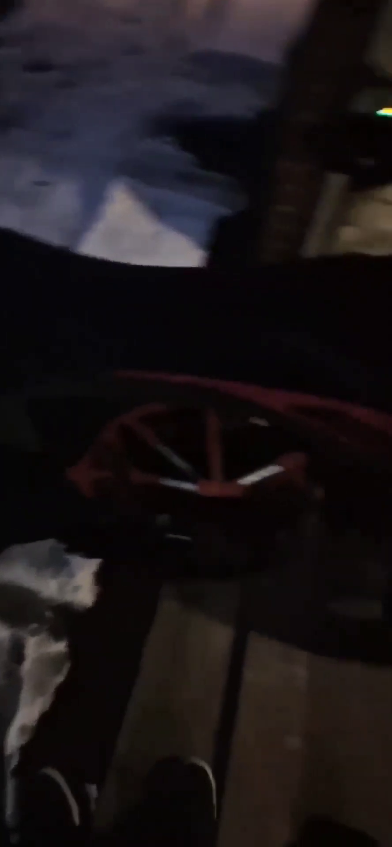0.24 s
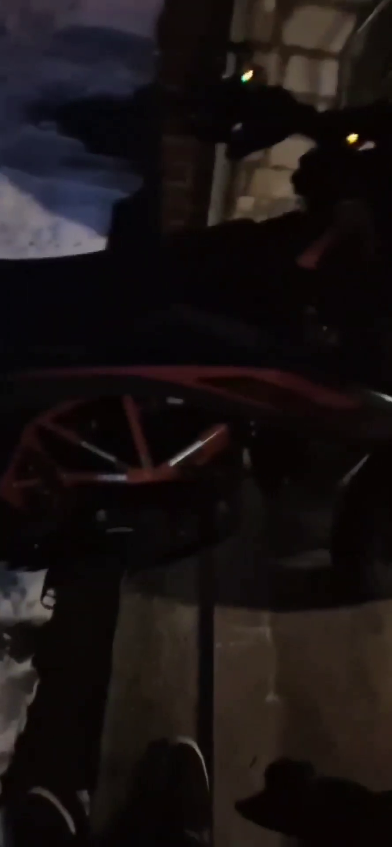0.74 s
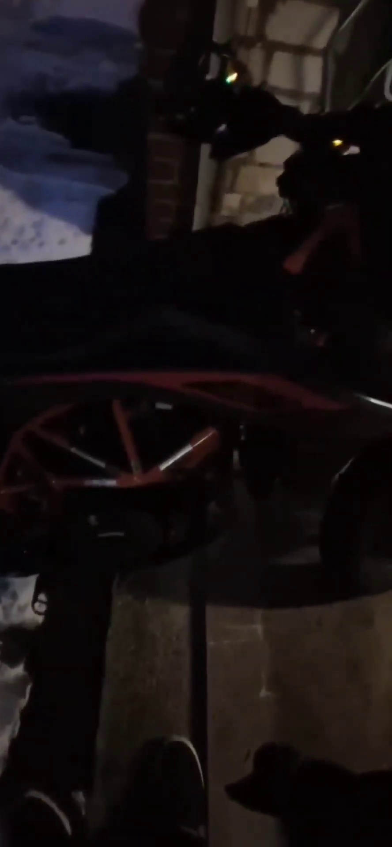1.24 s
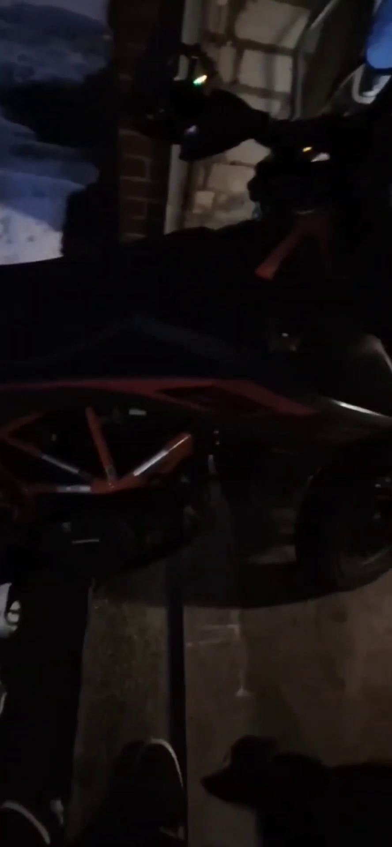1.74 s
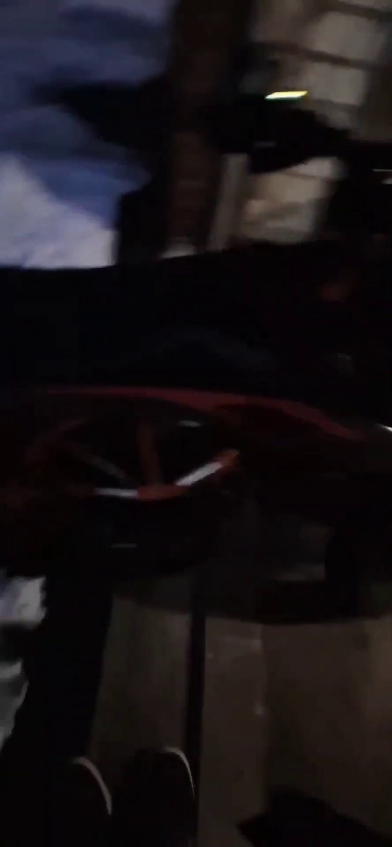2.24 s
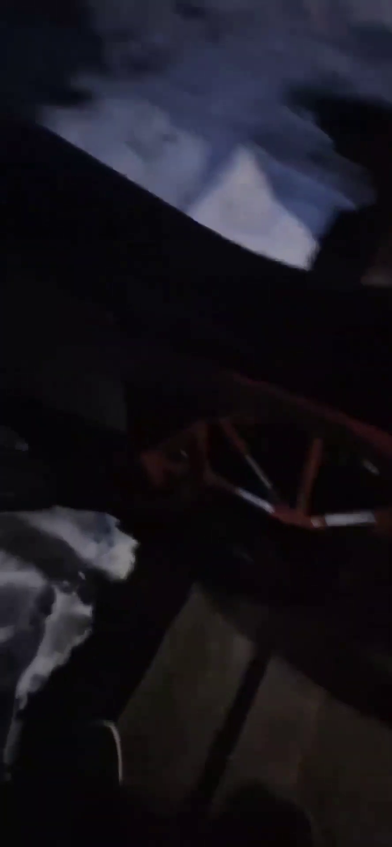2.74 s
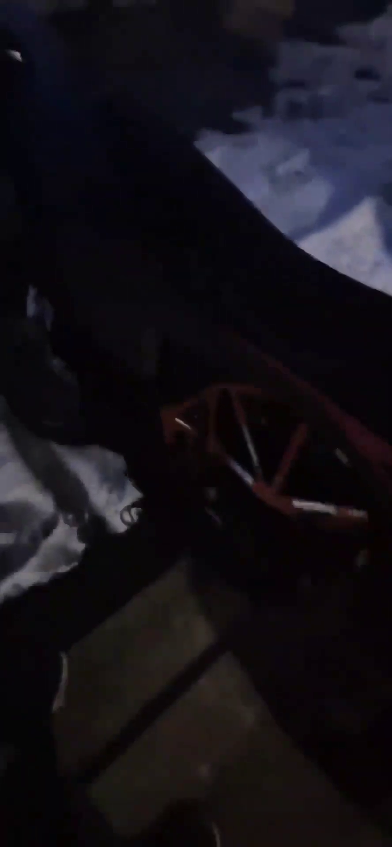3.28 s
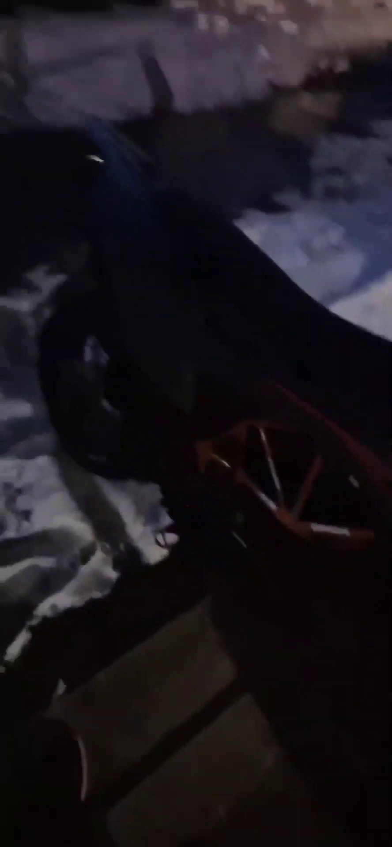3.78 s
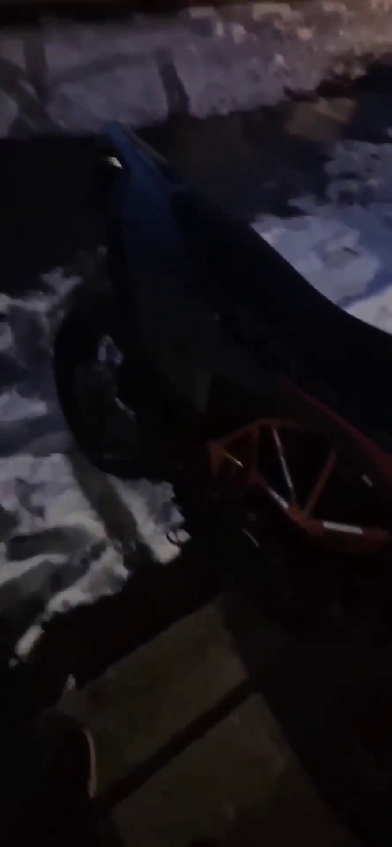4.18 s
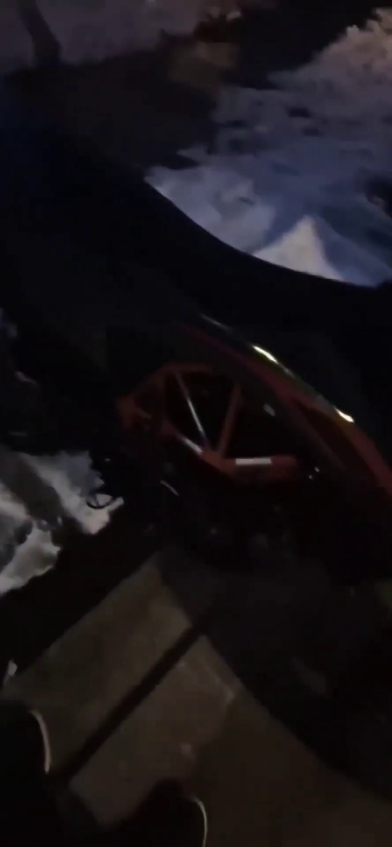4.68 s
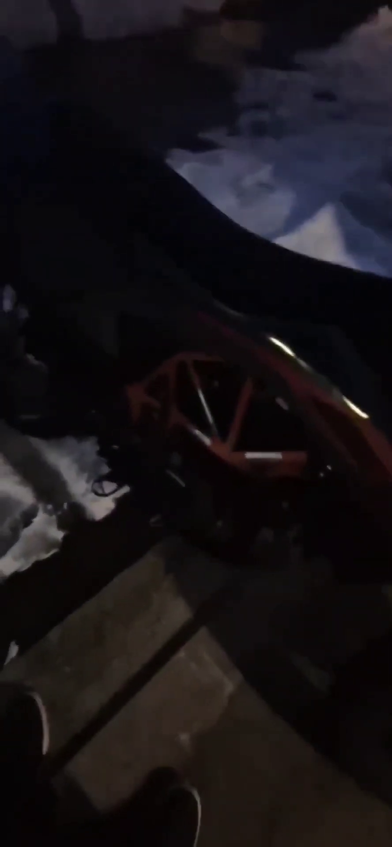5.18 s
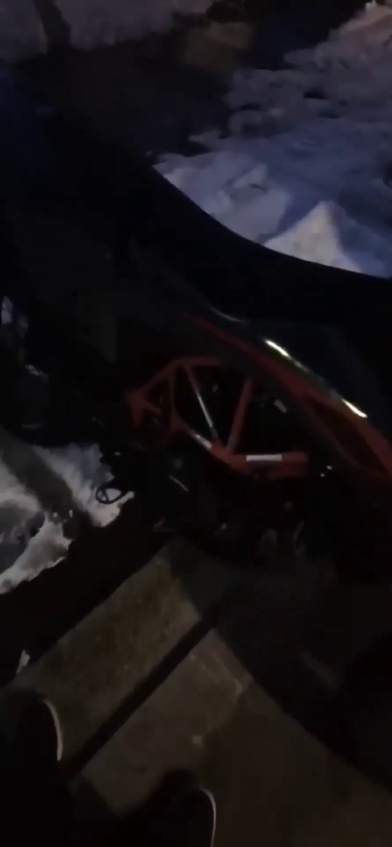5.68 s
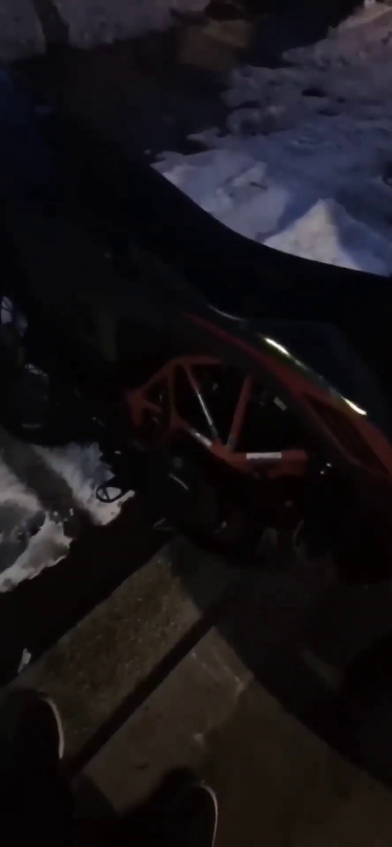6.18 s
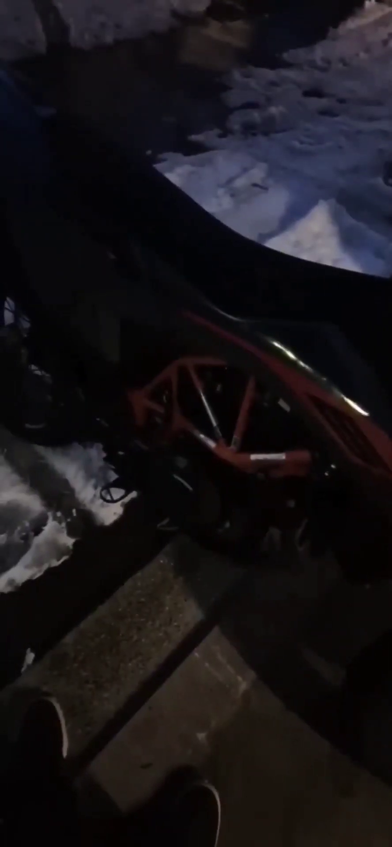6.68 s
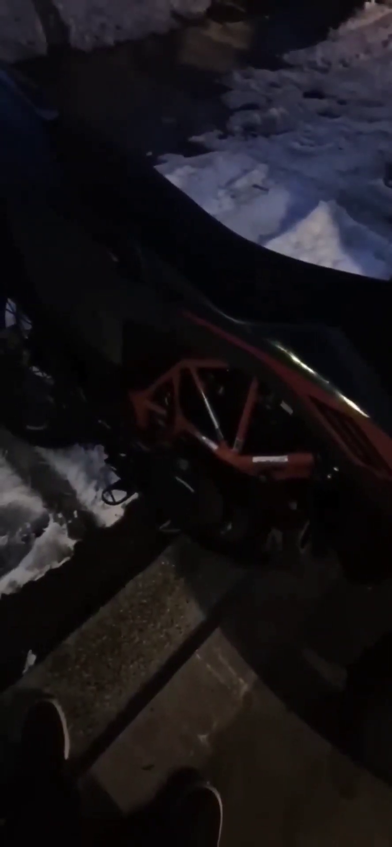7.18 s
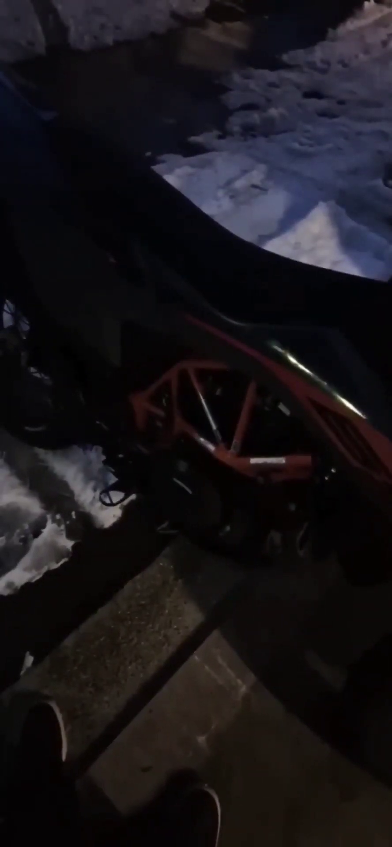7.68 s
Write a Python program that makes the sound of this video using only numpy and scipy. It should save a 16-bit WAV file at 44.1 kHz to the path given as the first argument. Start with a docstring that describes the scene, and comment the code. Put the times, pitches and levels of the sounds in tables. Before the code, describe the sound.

Outdoors at night, close to a motorcycle, the starter is already cranking. From 0 to about 1.6 s four slow cycles pass, one every 0.44 s: a rough toothed grind sags in pitch under compression, a deep hollow exhaust pop and softer puff follow, and most cycles end in a loose metallic clank. A brief squeal comes near 0.9 s. At 1.6 s the clutch knocks and the cranking stops. Until 2.8 s there is low outdoor rumble with very faint gliding whines, a dull click at 2.2 and a crisper relay click at 2.8. The starter then engages with whirring, chattering gears, ringing knocks and short squeals, its exhaust nearly silent until 3.9 s. From there heavy thumping, grinding and clanking repeat steadily to 8 s, with a strong clutch knock at 4.5, lesser ones around 6.6 and 7.2, and occasional squeals. The engine never catches; nearby walls answer briefly.

```python
"""An electric starter cranks a cold twin-cylinder motorcycle in a yard, in two spells; it never catches. From
the start toothed gears grind, sag in pitch on each compression and clank when the crank overruns. The cylinders
thump and puff unburnt charge into a ringing exhaust pipe; some strokes squeal. In the pause faint sine whines
glide and clicks sound; clutch blows ring the housing, mostly on restarting, and the second spell grinds on to
the end over a low outdoor rumble of shaped noise."""
import sys
import numpy as np
from scipy import signal
from scipy.fft import rfft, irfft, next_fast_len
from scipy.io import wavfile
from scipy.ndimage import uniform_filter1d, map_coordinates

SR = 44100
rng = np.random.default_rng(int(sys.argv[2]) if len(sys.argv) > 2 else 0)


def file_out(sig):
    """Save sig as 16-bit WAV at sys.argv[1]."""
    # one column per channel
    cols = np.atleast_2d(sig).T
    # limit, then scale
    lim = np.clip(cols, -1, 1)
    pcm = np.round(lim * 32767).astype(np.int16)
    wavfile.write(sys.argv[1], SR, pcm)


N = 349713

# Engine cycles. Each row: exhaust pop in s, lead of the short stroke in s, lag to the second cylinder's
# puff in s, lag to the overrun in s, then relative levels of exhaust, grind and overrun clank in dB.
ENGINE_CYCLES = [(.1515, .077, 0.069, 0.12, -1, -22.5, -16.5), (.5895, 0.074, .072, 0.12, -1, -23, -17.5),
                 (1.0285, 0.074, 0.068, 0.12, -1, -23, -17.5), (1.462, 0.078, 0.08, .136, -1.5, -23, -45),
                 (3.17, .072, 0.055, 0.096, -23, -24, -31), (3.55, 0.076, 0.062, 0.1, -32, -23, -38),
                 (3.9369, 0.076, 0.07, 0.13, 0, -22.5, -16),
                 (4.3792, 0.082, 0.097, 0.16, -1.5, -22.5, -14.5),
                 (4.8756, 0.074, .072, 0.13, 0, -22.5, -16.5), (5.3138, .076, 0.071, 0.13, 0, -23, -16),
                 (5.7554, .077, .075, .128, -0.5, -22, -14.5), (6.198, .076, 0.07, 0.13, 0.5, -23, -17),
                 (6.6299, .074, 0.071, 0.13, 0, -22.5, -18.5), (7.0613, 0.073, 0.083, 0.14, -0.5, -23, -15),
                 (7.528, 0.077, .07, 0.13, 0, -22.5, -22), (7.938, 0.075, .073, .126, -2, -23.5, -12)]
# Starter motor. Each row: time in s, share of full speed, relative gear whirr in dB.
STARTER_RUN = [(1.5, 0.99, -44.5), (1.7, 0.79, -76), (1.77, 0.97, -65.5), (2.795, 0.59, -114),
               (2.812, 0.71, -37.5), (2.9, 0.73, -33.5), (3.06, 0.89, -43), (3.17, 0.83, -43.5),
               (3.22, 0.87, -33.5), (3.33, .9, -40.5), (3.45, 0.98, -44), (3.56, .95, -38.5),
               (3.62, 0.84, -36), (3.85, 1, -43)]
# Starter clutch slips and grabs, plus the late overrun clank that ends the first spell at 1.643 s. Each row:
# time in s, relative level in dB, mean ring in Hz.
CLUTCH_GRABS = [(1.643, -19.5, 1550), (2.964, -22, 2363), (3.101, -21, 2742), (3.186, -18.5, 1290),
                (3.258, -17, 2264), (3.378, -24, 2330), (3.574, -17, 2135), (3.644, -18.5, 2310),
                (3.767, -25, 2250), (4.486, -11.5, 1397), (6.584, -18.5, 2230), (7.158, -19.5, 1435)]
# Stereo lean. Each row: frequency in Hz, left minus right in dB.
STEREO_LEAN = [(120, -2.5), (500, -1.5), (1200, -4.5), (2300, 2.5), (4000, 3), (8000, 4.5)]


def amp(db):
    """Decibels to gain."""
    return 10 ** (np.asarray(db) / 20)


def unit(x):
    """Scale to rms 1."""
    return x / np.sqrt(np.mean(x ** 2) + 1e-20)


def along(points, hz):
    """Interpolate (Hz, value) points on a log frequency axis."""
    f, v = np.transpose(points)
    return np.interp(np.log(hz + 1), np.log(f + 1), v)


def clock():
    """Time of each sample in s."""
    return np.arange(N) / SR


def curves(rows):
    """One value per sample for each column after the time."""
    s, *cols = np.transpose(rows)
    return [np.interp(clock(), s, c) for c in cols]


def wobble(rate):
    """Smooth random curve, rate knots a second."""
    return map_coordinates(rng.standard_normal(int(N * rate / SR) + 4), [clock() * rate])


def wobble_pair(rate):
    """Two independent wobbles."""
    return np.array([wobble(rate), wobble(rate)])


def noise_pair():
    """Two independent white noises."""
    return rng.standard_normal((2, N))


def filtered(x, response):
    """Multiply the spectrum of x by a response of frequency."""
    m = next_fast_len(N + SR // 2)
    return irfft(rfft(x, m) * response(np.fft.rfftfreq(m, 1 / SR)), m)[..., :N]


def coloured(x, spectrum):
    """Filter x by (Hz, dB) points, to rms 1."""
    return unit(filtered(x, lambda hz: amp(along(spectrum, hz))))


def add(track, s, sound):
    """Mix a sound into a track at time s."""
    start = int(np.clip(round(s * SR), 0, N))
    track[start:start + len(sound)] += sound[:N - start]


def add_leaning(track, s, sound, hz):
    """Mix a mono sound into a stereo track with the lean at its frequency."""
    for side, sign in zip(track, (.5, -.5)):
        add(side, s, amp(sign * along(STEREO_LEAN, hz)) * sound)


def spread(pair):
    """Two unrelated signals become left and right, alike in the bass, leaning by frequency."""
    # Each row: frequency in Hz, likeness of left and right from 0 to 1.
    likeness = [(250, 1), (500, 0.89), (1000, 0.58), (2300, 0.7), (9000, 0.074)]

    def mid_side_gains(hz):
        turn = np.arccos(np.clip(along(likeness, hz), -1, 1)) / 2
        return np.array([np.cos(turn), np.sin(turn)])

    def lean_gains(hz):
        return amp(np.outer([.5, -.5], along(STEREO_LEAN, hz)))

    mid, side = filtered(pair, mid_side_gains)
    return filtered(np.array([mid + side, mid - side]), lean_gains)


def blows(rows, rise, decay):
    """Envelope of (s, dB) blows that swell and die away; rise and decay in s."""
    t, track = np.arange(SR // 5) / SR, np.zeros(N)
    shape = (1 - np.exp(-(t / rise) ** 2)) * np.exp(-t / decay)
    for s, db in rows:
        add(track, s, amp(db) * shape / shape.max())
    return track


def night():
    """Low outdoor rumble: noise weighted to the bass."""
    # Each row: frequency in Hz, relative level in dB per Hz.
    night_spectrum = [(15, -29), (25, 2.5), (67, -2), (604, -15.5), (2200, -32.5), (6200, -39.5),
                      (10000, -44.5), (15000, -52)]
    return amp(-46) * spread(coloured(noise_pair(), night_spectrum))


def compressions(swell_db, ease_db, rise, release):
    """Load, its singing part and full-speed mesh pitch: each stroke swells the load and drags pitch down."""
    # Gear mesh over a compression. Each row: share of the stroke, mesh in Hz at full speed.
    mesh_sag = [(-.8, 1467), (0, 1400), (.44, 1280), (.73, 1200), (1, 1150), (1.8, 1480)]
    long_lead_s, long_s, long_db = .207, .07, .5
    short_s, short_whine_db = .051, -4.5
    t, load, song = clock(), np.zeros(N), np.zeros(N)
    mesh_hz = np.full(N, float(mesh_sag[-1][1]))
    strokes = []
    for pop, lead, _, _, _, db, _ in ENGINE_CYCLES:
        strokes.append((pop - long_lead_s, long_s, db + long_db, 0))
        strokes.append((pop - lead, short_s, db, short_whine_db))
    for start, length, db, whine_db in strokes:
        end = start + length
        near = slice(max(int((start - .1) * SR), 0), int((end + .1) * SR))
        u = (t[near] - start) / length
        before, after = np.minimum(t[near] - start, 0), np.maximum(t[near] - end, 0)
        edges = np.exp(before / rise - after / release)
        push = edges * amp(db + np.interp(u, [0, .45, .75, 1], [-swell_db, 0, 0, -ease_db]))
        load[near] += push
        song[near] += push * amp(whine_db)
        mesh_hz[near] = np.minimum(mesh_hz[near], np.interp(u, *np.transpose(mesh_sag)))
    return load, song, mesh_hz


def backlash(bounce_s, bounce_db, count=3):
    """Gears take up slack, knock before the puff, clank and bounce on overrun; the clutch jars them too."""
    # Knocks before the puff. Each row: lead in s, relative level in dB.
    gear_knocks = [(0.019, -24.5), (0.0088, -22)]
    take_up_db = 2.5  # over the grind
    clank_delay_s, bounce_loss_db = .0178, 3.5  # from overrun to clank; loss at each further bounce
    clutch_bounce_db = -11.5
    hits = []
    for pop, lead, lag, overrun, _, grind_db, clank_db in ENGINE_CYCLES:
        hits.append((pop - lead + .0031, grind_db + take_up_db))
        hits += [(pop + lag - knock_lead, db) for knock_lead, db in gear_knocks]
        clank_s = pop + overrun + clank_delay_s
        hits.append((clank_s, clank_db))
        for k in range(count):
            hits.append((clank_s + (k + 1) * bounce_s, clank_db + bounce_db - k * bounce_loss_db))
    for s, db, _ in CLUTCH_GRABS:
        hits += [(s, db), (s + bounce_s, db + clutch_bounce_db)]
    return blows(hits, rise=.0022, decay=.0105)


def judder():
    """Loaded gears catch and let go at an uneven rate: a sawtooth of gain in dB."""
    mean_hz, depth_db = 70, 5
    turns = np.cumsum(mean_hz * (1 + .2 * wobble(60))) / SR
    return unit(uniform_filter1d(amp(-depth_db * (turns % 1)), size=30))


def frame(x, t60):
    """Covers and frame tubes ring with a thicket of short modes, differently towards each ear."""
    t = np.arange(SR // 12) / SR
    ring = rng.standard_normal((2, len(t))) * amp(-60 * t / t60)
    return signal.fftconvolve(x[None], ring / np.linalg.norm(ring[0]), axes=1)[:, :N]


def ticks(force):
    """Now and then a tooth lands hard: a dry tick that stands out of the rasp."""
    mean_per_s, spread_db = 380, 4
    sizes = amp(spread_db * np.clip(rng.standard_normal(N), -2, 1.5))
    hits = (rng.random(N) < mean_per_s / SR) * sizes
    return amp(-3) * unit(frame(force * hits, t60=.005))


def case(x):
    """x rings the resonances of engine case and starter housing, at rms 1."""
    # Each row: centre in Hz, width in Hz, relative level in dB.
    case_modes = [(1090, 50, 1.5), (1298, 50, -1.5), (1421, 49, 2.5), (1874, 250, 4), (2270, 127, 3.5),
                  (2743, 103, 4.5), (4540, 330, -6.5)]

    def response(f):
        total = 0
        for k, (centre, width, db) in enumerate(case_modes):
            damping = 1j * f * width
            total = total + (-1) ** k * amp(db) * damping / (centre ** 2 - f ** 2 + damping)
        return total

    return unit(filtered(x, response))


def mesh_tones(teeth, partials, flutter_db, flutter_rate, drift_rad, drift_rate):
    """Sines at multiples of the tooth rate, wavering in level and, separately in each channel, in phase."""
    total = 0
    for k, db in partials:
        phase = 2 * np.pi * k * teeth + drift_rad * wobble_pair(drift_rate)
        total = total + amp(db + flutter_db * wobble(flutter_rate)) * np.sin(phase)
    return total


def starter():
    """Loaded gear teeth strike and whine into the case; unloaded, they rattle loosely and clank."""
    # Each row: frequency in Hz, relative level in dB per Hz.
    gear_spectrum = [(150, -18), (260, 3), (430, -13.5), (700, 1.5), (900, -4.5), (1300, 1), (2500, 4),
                     (3300, -4), (5300, -5.5), (6300, -16.5), (8500, -18.5), (10000, -8.5), (13000, -12),
                     (15500, -25)]
    # Gear mesh whine. Each row: multiple of the mesh, relative level in dB.
    whine_partials = [(1, -3), (2, 1), (3, -7), (4, -8)]
    # Motor howl below full speed. Each row: multiple of the mesh, relative level in dB.
    labour_partials = [(1, 5), (2, 1)]
    speed, whirr_db = curves(STARTER_RUN)
    load, song, mesh_hz = compressions(swell_db=5, ease_db=2, rise=.003, release=.009)
    clank = backlash(bounce_s=.0227, bounce_db=-5.5)
    whirr = amp(whirr_db + 1.27 * wobble(45))
    teeth = np.cumsum(mesh_hz * speed * (1 + .018 * wobble(35) + .023 * wobble(450))) / SR
    force = np.sqrt((load * judder()) ** 2 + (.44 * clank) ** 2 + (.96 * whirr) ** 2)
    force_rms = np.sqrt(np.mean(force ** 2))
    # one impact a tooth, uneven in size, beating once a turn of the 11-tooth pinion
    tooth_db = 2.5 * np.sin(2 * np.pi * teeth / 11) + 6 * wobble(1400)
    impacts = np.diff(np.floor(teeth), prepend=0) * amp(tooth_db)
    rasp = unit(frame(force * impacts, t60=.02)) + ticks(force)
    hiss = amp(-3) * unit(force * noise_pair())
    rattle = coloured(spread(rasp + hiss), gear_spectrum)
    # chains and slack gears chatter without a pitch
    chatter = spread(amp(.51 * wobble(400)) * noise_pair())
    chatter_mix = amp(2) * coloured(chatter, gear_spectrum) + amp(-6) * case(chatter[::-1])
    loose = (1.53 * whirr + .23 * clank) * chatter_mix
    # through the case, whine is strongest where a multiple of the mesh crosses a resonance
    tones = mesh_tones(teeth, whine_partials, 8, 110, .96, 60)
    whine = unit(spread((song + .35 * clank) * tones))
    # below full speed the motor labours and howls on its lowest mesh tones
    howl = mesh_tones(teeth, labour_partials, 2.5, 80, .7, 90)
    labour = np.maximum(1 - speed, 0) * (song + 3.2 * whirr) * spread(howl)
    return loose + labour + force_rms * (rattle + amp(-11) * whine + amp(-6.5) * case(whine))


def shake():
    """The turning engine shakes the whole machine: low noise that grows with speed and whirr."""
    speed, whirr_db = curves(STARTER_RUN)
    # Each row: frequency in Hz, relative level in dB per Hz.
    rumble = coloured(noise_pair(), [(30, 7.5), (70, -8), (260, -7.5), (700, -27.5)])
    return speed ** 2 * amp(whirr_db + 5.5) * spread(rumble)


def yard(x):
    """House wall and paving answer briefly: a decaying noise tail, 200 samples late."""
    # Each row: frequency in Hz, reverberation t60 in s.
    yard_decay = [(200, 0.47), (2000, 0.26), (10000, 0.17)]
    hz, t, z = signal.stft(rng.standard_normal((2, SR // 3)), SR, nperseg=256)
    decay = amp(-60 * t / along(yard_decay, hz)[:, None])
    tail = signal.istft(z * decay, SR, nperseg=256)[1]
    late = np.pad(tail, ((0, 0), (200, 0))) / np.linalg.norm(tail[0])
    return signal.fftconvolve(x, late, axes=1)[:, :N]


def thumps(hz, peak_s, steep, rebound_s, rebound_db):
    """Each compression lets go with a low lurch, and the engine rebounds once on its mounts."""
    lurch_lead_s = .011
    lurch_db, overrun_db, weak_lurch_db = -14, -11, -17.5
    t, track = np.arange(SR // 5) / SR, np.zeros(N)
    lurch = (t / peak_s * np.exp(1 - t / peak_s)) ** steep * np.sin(2 * np.pi * hz * t)
    lurches = [(3.086, -14)]  # first compression after the rest: s, dB
    for pop, lead, lag, overrun, exhaust_db, _, _ in ENGINE_CYCLES:
        # weakly into the short stroke, hard over top dead centre before the puff, again on the overrun
        lurches.append((pop - lead - .015, weak_lurch_db))
        lurches.append((pop + lag - lurch_lead_s, lurch_db))
        lurches.append((pop + overrun, overrun_db + exhaust_db))
    for s, db in lurches:
        add(track, s, amp(db) * lurch)
        add(track, s + rebound_s, amp(db + rebound_db) * lurch)
    return track


def exhaust(pop_db, echo_s, echo_db, puff_db, puff_hz, lead_s, rise, gas_db):
    """Blowdowns ring the pipe and send gas down it; the pop returns once, the soft puff favours low modes."""
    # Pipe modes. Each row: mean frequency in Hz, mean relative level in dB, t60 in s.
    pipe_modes = [(35.7, -9, .3), (55.3, -1.5, 0.4), (91.2, 2, 0.2), (138.5, -10.5, 0.13),
                  (184.6, -16.5, 0.26), (262.4, 1, 0.059), (352.3, -9, 0.082)]
    # Each row: frequency in Hz, relative level in dB per Hz.
    gas_spectrum = [(40, -12), (130, 0.5), (260, 1.5), (420, -9), (560, -7.5), (720, 1.5), (950, -12),
                    (1500, -9), (4000, -31)]
    t, pipe, puffs = np.arange(SR // 3) / SR, np.zeros(N), []
    opening = 1 - np.exp(-(t / rise) ** 2)
    for pop, _, lag, _, exhaust_db, _, _ in ENGINE_CYCLES:
        # in the first spell the silencer is nearer and sounds brighter
        near_db = 3 if pop < 2 else 0
        for hz, db, t60 in pipe_modes:
            level_db = exhaust_db + db + near_db * (hz > 120) + rng.normal(0, 1) - 60 * t / t60
            mode_hz = hz * (1 + .022 * rng.normal())
            ring = -np.cos(2 * np.pi * mode_hz * (t - lead_s)) * amp(level_db) * opening
            add(pipe, pop - lead_s, amp(pop_db) * ring)
            add(pipe, pop - lead_s + echo_s, amp(pop_db + echo_db) * ring)
            add(pipe, pop + lag - lead_s, amp(puff_db) * ring / (1 + (hz / puff_hz) ** 2))
        puffs += [(s - .008, gas_db + exhaust_db) for s in (pop, pop + lag)]
    flow = blows(puffs, rise=.00094, decay=.056)
    return pipe + flow * spread(coloured(noise_pair(), gas_spectrum))


def squeals(rough):
    """The mesh lingers on a housing resonance: a brief tone swells and fades as its pitch sags through."""
    # Each row: middle in s, relative level in dB, centre in Hz.
    squeal_rows = [(.872, -18, 2347), (2.977, -17, 2338), (3.012, -21.5, 1080), (3.335, -27.5, 5148),
                   (3.39, -17, 2293), (3.725, -33, 5170), (4.218, -18, 2335), (4.716, -13.5, 2338),
                   (6.04, -17.5, 2335), (6.905, -20, 2334)]
    sag_share_per_s, width_s = 1.068, .014
    t, track = np.arange(-SR // 20, SR // 20) / SR, np.zeros((2, N))
    for s, db, centre_hz in squeal_rows:
        hz = centre_hz * (1 + rough * wobble(300)[:len(t)] - sag_share_per_s * t)
        tone = amp(db) * np.exp(-(t / width_s) ** 2) * np.sin(2 * np.pi * np.cumsum(hz) / SR)
        add_leaning(track, s + t[0], tone, centre_hz)
    return track


def clutch(ring_db, decay, rough):
    """Each grab of the starter clutch, and the late last clank of the first spell, rings the housing briefly at
    a rough pitch."""
    t, track = np.arange(SR // 10) / SR, np.zeros((2, N))
    for s, db, hz in CLUTCH_GRABS:
        phase = 2 * np.pi * np.cumsum(hz * (1 + rough * wobble(460)[:len(t)])) / SR
        envelope = (1 - np.exp(-t / .0013)) * np.exp(-t / decay)
        add_leaning(track, s, amp(db + ring_db) * envelope * np.sin(phase), hz)
    return track


def pause():
    """Thin sine whines glide while the starter rests; its button and relay click as noise snaps."""
    # Starter button and relay. Each row: time in s, relative level in dB, low-pass corner in Hz.
    click_rows = [(2.222, -38.5, 1500), (2.797, -29.5, 7040)]
    # One list per whine. Each row: time in s, mean pitch in Hz, mean relative level in dB.
    whine_glides = [
        [(1.7, 1610, -65), (1.87, 1526, -60), (2.05, 1390, -74)],
        [(2.1, 1910, -72), (2.3, 2100, -63), (2.47, 2180, -57), (2.6, 2340, -65), (2.72, 2420, -76)],
        [(2.06, 6300, -76), (2.6, 5500, -75)],
    ]
    # Each row: frequency in Hz, relative level in dB per Hz.
    snap = coloured(noise_pair(), [(150, -8), (300, 2), (2500, -2), (5500, -11), (12000, -15)])
    sound = 0
    for s, db, dull_hz in click_rows:
        dulled = filtered(spread(snap), lambda hz: 1 / np.hypot(1, hz / dull_hz))
        sound = sound + blows([(s, db)], rise=.0029, decay=.015) * dulled
    for rows in whine_glides:
        hz, db = curves(rows)
        sounding = 1. * (clock() > rows[0][0]) * (clock() < rows[-1][0])
        gate = uniform_filter1d(sounding, size=1500)
        phase = 2 * np.pi * np.cumsum(hz * (1 + .008 * wobble(220))) / SR
        tone = np.sin(phase) + amp(-14) * np.sin(2 * phase)
        sound = sound + gate * amp(db + 2 * wobble(24.9)) * tone
    return sound


def scene():
    """Gears, engine and exhaust close by; the yard answers the gears."""
    gears = starter() + squeals(rough=.011) + clutch(ring_db=1, decay=.0089, rough=.075) + pause()
    engine = thumps(hz=69.3, peak_s=.015, steep=2.63, rebound_s=.03344, rebound_db=-4.5)
    pipe = exhaust(pop_db=-11.5, echo_s=.01213, echo_db=-2, puff_db=-11.5, puff_hz=156,
                   lead_s=.0051, rise=.0047, gas_db=-24)
    return gears + amp(-8) * yard(gears) + engine + pipe + shake() + night()


def record(dry):
    """Roll off the deepest bass below 20 Hz and cut everything from the band limit up."""
    top_hz = 15600
    return filtered(dry, lambda hz: (hz < top_hz) * hz ** 4 / (hz ** 4 + 20 ** 4))


dry = scene()
out = record(dry)
file_out(out)
```